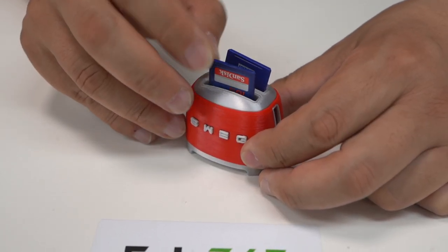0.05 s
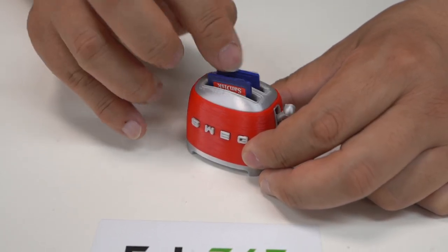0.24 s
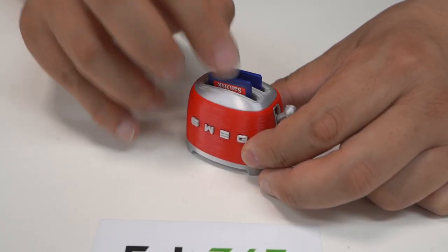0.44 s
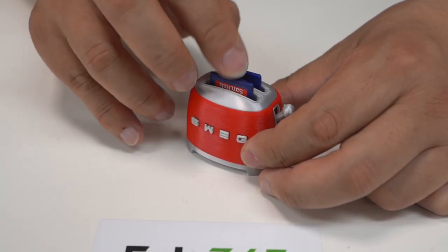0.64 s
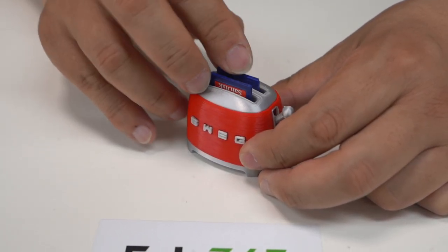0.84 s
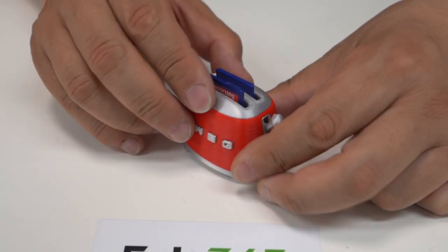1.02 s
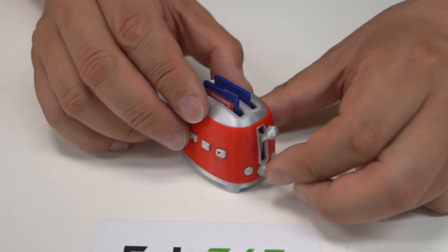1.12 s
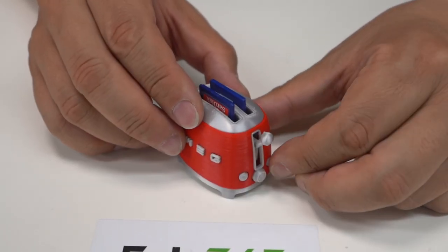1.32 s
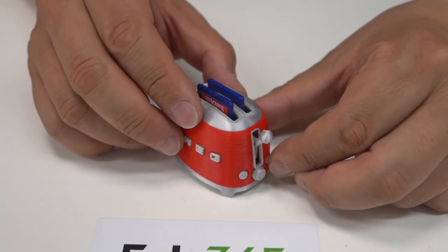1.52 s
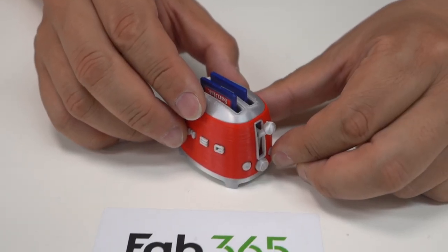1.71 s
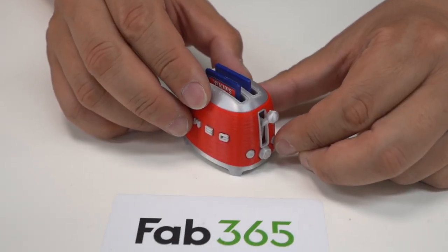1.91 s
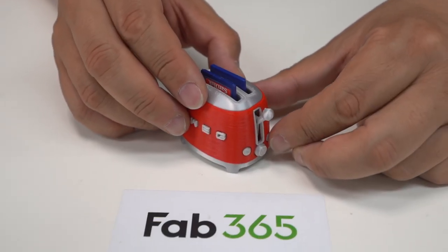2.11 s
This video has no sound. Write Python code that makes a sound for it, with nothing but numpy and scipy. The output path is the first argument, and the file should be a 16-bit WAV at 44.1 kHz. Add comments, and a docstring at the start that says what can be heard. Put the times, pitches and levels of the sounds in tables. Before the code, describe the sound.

A sharp plastic snap, led by light ticks and a tiny scrape, as two memory cards are pushed into a small hollow holder. Two softer clicks follow, then faint finger rubbing, close by on a table in a quiet room.

```python
"""Light ticks, then a short scrape and a sharp snap: two memory cards are pushed home in a small hollow
plastic holder, close by on a table. A fingertip presses them twice more, then hands turn the holder.
Each impact excites damped modes of the shell, its base and the table; stick-slip friction makes the
scrape and the rubbing of skin. A quiet small room adds a short reverberation and a low steady noise."""
import sys
import numpy as np
from scipy import signal
from scipy.fft import rfft, irfft, next_fast_len
from scipy.io import wavfile
from scipy.ndimage import uniform_filter1d

SR = 44100
rng = np.random.default_rng(int(sys.argv[2]) if len(sys.argv) > 2 else 0)


def file_out(sig):
    """Save sig as 16-bit WAV at sys.argv[1]."""
    # one column per channel
    cols = np.atleast_2d(sig).T
    # limit, then scale
    lim = np.clip(cols, -1, 1)
    pcm = np.round(lim * 32767).astype(np.int16)
    wavfile.write(sys.argv[1], SR, pcm)


N = 94815

# impacts of cards and holder: t/s, shell level/dB, favoured f/Hz, crack/dB, base/dB, table/dB
IMPACTS = [(.0072, -54.5, 2740, -76, -51, -70), (0.0783, -61, 4680, -74, -53.5, -63),
           (0.0782, -39, 3004, -54.5, -46, -61), (0.0884, -54.5, 4040, -69, -47, -76),
           (0.2384, -18, 4170, -16, -24, -55.5), (0.24, -24.5, 5400, -38, -28, -46),
           (0.2612, -31, 2900, -64, -37, -62), (0.334, -70, 4780, -51, -73, -74),
           (0.3562, -69, 4510, -50.5, -60, -70), (0.4872, -43, 1780, -69, -71, -40),
           (0.4895, -36, 3780, -51, -52, -36.5), (0.5056, -50, 2400, -72, -45, -37),
           (.5088, -39, 2410, -56, -46.5, -46), (0.7526, -37.5, 1670, -48.5, -49, -63),
           (0.7549, -33.5, 3916, -43, -38, -57), (0.7671, -41, 4370, -45, -59, -71.5),
           (1.0585, -73, 3900, -61.5, -70, -77), (1.1527, -80, 3870, -80, -58, -68),
           (1.1953, -60.5, 4010, -71, -62.5, -72.5), (2.1162, -56, 3950, -64, -75, -83)]
# normal modes of the shell, its base and the table: f/Hz, relative level/dB, t60/s
SHELL_MODES = [(1210, -10, 0.032), (1820, -11.5, .012), (2900, -6.5, .016), (3620, -6.5, .022),
               (3950, -2, 0.022), (4530, -3, 0.0076), (4950, -4.5, .01), (5370, -8.5, 0.0089),
               (6480, -5, .01)]
BASE_MODES = [(372, -9.5, 0.1), (472, -4, 0.046), (537, -11, .035), (728, -14.5, 0.012), (830, -12, .025),
              (957, -10.5, .025), (1042.7, -8.5, 0.033)]
TABLE_MODES = [(102.8, -13, .06), (158.9, -5.5, .05), (237, 0, .05), (281, -3, .045)]
# a card sliding in its slot: t/s, duration/s, scrape level/dB, drumming of the base/dB
SLIDES = [(0.2243, 0.017, -32.5, -35)]
# fingernail brushing the cards: t/s, rise/s, ring t60/s, ring level/dB, hiss level/dB
BRUSHES = [(0.591, 0.0042, 0.22, -63, -78), (.905, 0.018, 0.086, -79.5, -73),
           (1.128, .01, 0.07, -81.5, -74), (1.70, .02, 0.21, -81, -89)]
# envelope of the fingers' rubbing: t/s, level/dB
RUB_LEVELS = [(0, -62), (.1, -66.5), (.2, -71.5), (.45, -76.5), (.62, -76.5), (.72, -75), (0.919, -70),
              (0.999, -74), (1.05, -64.5), (1.121, -69), (1.172, -64.5), (1.23, -75), (1.5, -80.5),
              (1.72, -74.5), (1.881, -76.5), (2.039, -70), (2.09, -64.5), (2.15, -76)]
# judders of the turning holder and a finger's stick-slip tone: t/s, duration/s, f/Hz, level/dB
JUDDERS = [(1.22, 0.11, 135.5, -67.5), (1.972, 0.057, 249, -60.5), (1.983, 0.075, 68, -65.5)]
# spectra of the impact and friction noises: f/Hz, relative level/dB
CRACK_SPECTRUM = [(40, -27), (300, -7), (1200, -8.5), (2200, -22.5), (4300, -5), (6000, 5), (8200, -2.5),
                  (10500, 0), (12500, -0.5), (14000, -7.5), (16500, -7.5)]
CHATTER_SPECTRUM = [(40, -27.5), (200, -5.5), (1000, 3), (1300, -8.5), (2000, -8), (4200, -0.5), (5600, -8),
                    (7500, -19), (16000, -27)]
SCRAPE_SPECTRUM = [(40, -30.5), (300, -13.5), (1000, 0), (2100, -9), (3300, -4.5), (4300, 4.5),
                   (5400, -2.5), (7500, -13), (10800, -3.5), (13500, -11.5), (16500, -11.5)]
DRUM_SPECTRUM = [(30, -37), (70, -17), (170, 0.5), (450, -7), (1000, -11), (1300, -19.5), (6000, -46.5)]
CARD_SPECTRUM = [(1000, -15), (3000, -15.5), (3700, -6.5), (4200, -1), (4800, -9.5), (5800, -21),
                 (9000, -21.5), (16000, -43)]
HISS_SPECTRUM = [(2000, -10), (6000, -2), (13000, 0), (16000, 3)]
SKIN_SPECTRUM = [(60, -14), (150, -3.5), (280, 6), (450, 0.5), (650, -7.5), (1000, -10.5), (1800, -20),
                 (3000, -23.5), (4300, -19), (6500, -42), (16000, -30.5)]
# reverberation time of the room: f/Hz, t60/s
REVERB_T60 = [(150, 0.43), (500, 0.33), (2500, 0.31), (5500, 0.38), (12000, 0.22)]
# spectra of the reverberation and of the mid and side background noise: f/Hz, relative level/dB
REVERB_SPECTRUM = [(80, -10), (200, -2.5), (450, 0.5), (750, 1), (1000, 0), (1400, 5), (2000, 3.5),
                   (3000, -1), (4200, -5.5), (5400, -4), (6300, -5), (7500, -8.5), (11000, -10.5),
                   (16000, -20)]
FLOOR_SPECTRUM = [(12, -30), (20, -7.5), (171, 1), (225, -7.5), (252, 1), (282, -8.5), (362, -3.5),
                  (491, -18), (631, -13), (1010, -24), (1300, -23), (2840, -25.5), (15500, -30)]
SIDE_SPECTRUM = [(20, -8), (100, -12.5), (1000, -21.5), (16000, -20)]


def impacts(crack_t60_s=0.007, chatter_t60_s=0.013, focus_db_per_octave=14):
    """Impact excitation: a contact cracks, chatters and rings the modes of shell, base and table."""
    out, t = np.zeros(N), np.arange(SR // 10) / SR
    for start, shell_db, focus_hz, crack_db, base_db, table_db in IMPACTS:
        crack_noise, chatter_noise = rng.standard_normal((2, len(t)))
        spike = amp(11) * (t == 0)
        crack = colour(spike + amp(-12.5 - 60 * t / crack_t60_s) * crack_noise, CRACK_SPECTRUM)
        chatter = colour(amp(-4.5 - 60 * t / chatter_t60_s) * chatter_noise, CHATTER_SPECTRUM)
        # the contact point favours the modes near one frequency
        excited = [(hz, db - focus_db_per_octave * abs(np.log2(hz / focus_hz)), t60)
                   for hz, db, t60 in SHELL_MODES]
        shell = amp(-4.5) * ring(excited, t, scatter_db=0.5, detune=0.0044) + chatter
        base = amp(base_db) * ring(BASE_MODES, t, scatter_db=2.5, detune=0.0045)
        table = amp(table_db) * ring(TABLE_MODES, t, scatter_db=1.5, detune=0.006)
        add(out, start, amp(shell_db) * shell + amp(crack_db) * crack + base + table)
    return out


def ring(modes, t, scatter_db, detune, rise_cycles=0.38):
    """Free vibration is a sum of damped modes; their levels and tuning vary from touch to touch."""
    out = np.zeros(len(t))
    for hz, db, t60 in modes:
        decay = amp(db + scatter_db * rng.normal() - 60 * t / t60)
        onset = 1 - np.exp(-t * hz / rise_cycles)
        out += decay * onset * np.sin(2 * np.pi * hz * (1 + detune * rng.normal()) * t)
    return out


def card_slide(rise_s=0.0045, fall_s=0.0013):
    """Stick-slip friction: a card scrapes down its slot and forces the base to drum."""
    out, t = np.zeros(N), np.arange(SR // 10) / SR
    for start, duration, scrape_db, drum_db in SLIDES:
        stroke = np.clip(t / rise_s, 0, 1) ** 2 * np.clip((duration - t) / fall_s, 0, 1)
        friction = stroke * slips(len(t), per_s=12000)
        add(out, start, amp(scrape_db) * colour(friction, SCRAPE_SPECTRUM))
        add(out, start, amp(drum_db) * colour(friction, DRUM_SPECTRUM))
    return out


def slips(n, per_s, spread_db=1.5):
    """Friction as shot noise: tiny slips of random time, sign and size, at unit rms."""
    pulses = (rng.random(n) < per_s / SR) * rng.choice([-1, 1], n)
    return unit(pulses * amp(spread_db * rng.standard_normal(n)))


def fingernail_brushes(hiss_t60_s=0.057):
    """Resonance driven by friction: a fingernail grazes a card edge, which hisses and rings on in a band."""
    out, t = np.zeros(N), np.arange(SR // 3) / SR
    for start, rise, ring_t60, ring_db, hiss_db in BRUSHES:
        for db, t60, spectrum in (ring_db, ring_t60, CARD_SPECTRUM), (hiss_db, hiss_t60_s, HISS_SPECTRUM):
            stroke = np.minimum(t / rise, 1) * amp(db - 60 * np.maximum(t - rise, 0) / t60)
            add(out, start, colour(stroke * rng.standard_normal(len(t)), spectrum))
    return out


def finger_rubbing():
    """Source and filter: slips of skin on the hollow shell merge into a dull rustle."""
    level_db = np.interp(np.arange(N) / SR, *np.transpose(RUB_LEVELS))
    return amp(level_db) * unit(colour(slips(N, per_s=900), SKIN_SPECTRUM))


def friction_judders(pitch_spread=0.037):
    """Frictional oscillation: the holder, dragged round, and a slipping finger give short low tones of unsteady
    pitch."""
    out = np.zeros(N)
    for start, duration, hz, db in JUDDERS:
        n = int(duration * SR)
        waver = unit(uniform_filter1d(rng.standard_normal(N), size=300))[:n]
        phase = 2 * np.pi * np.cumsum(hz * (1 + pitch_spread * waver)) / SR
        add(out, start, amp(db) * signal.windows.tukey(n, 0.5) * np.sin(phase))
    return out


def reverberation(direct, delay_s=0.0034, build_s=0.0019):
    """A diffuse field decays exponentially in each band, fastest in the highest treble."""
    hz, t, bands = signal.stft(rng.standard_normal(SR // 2), SR, nperseg=256)
    decay = amp(-60 * t / along(REVERB_T60, hz)[:, None])
    tail = signal.istft(bands * decay, SR, nperseg=256)[1]
    tail *= np.clip((np.arange(len(tail)) / SR - delay_s) / build_s, 0, 1)
    response = colour(tail / np.linalg.norm(tail), REVERB_SPECTRUM)
    return signal.fftconvolve(direct, response)[:N]


def room_noise(spectrum, level_db):
    """Stationary Gaussian noise forms the steady background."""
    return amp(level_db) * unit(colour(rng.standard_normal(N), spectrum))


def amp(db):
    """Amplitude ratio of a level in decibels."""
    return 10 ** (np.asarray(db) / 20)


def unit(x):
    """Normalisation to unit rms."""
    return x / np.sqrt(np.mean(x ** 2) + 1e-20)


def along(points, hz):
    """Interpolation of (f/Hz, value) points over log frequency."""
    f, values = np.transpose(points)
    return np.interp(np.log(hz + 1), np.log(f + 1), values)


def colour(x, spectrum):
    """Minimum-phase filter of unit energy; folding the cepstrum makes it causal."""
    m = 2 * next_fast_len(len(x) // 2 + 4096)
    gain = unit(amp(along(spectrum, np.fft.rfftfreq(m, 1 / SR))))
    cepstrum = irfft(np.log(gain), m)
    cepstrum[1:m // 2] *= 2
    cepstrum[m // 2 + 1:] = 0
    return irfft(rfft(x, m) * np.exp(rfft(cepstrum)), m)[:len(x)]


def add(track, start_s, sound):
    """Superposition of a sound on the track at a given time."""
    i = max(0, round(start_s * SR))
    track[i:i + len(sound)] += sound[:max(0, N - i)]


def scene():
    """Direct and diffuse sound add in the centre; faint noise in antiphase gives a little width."""
    direct = impacts() + card_slide() + fingernail_brushes() + finger_rubbing() + friction_judders()
    floor = room_noise(FLOOR_SPECTRUM, level_db=-70.5)
    mid = direct + amp(-15.5) * reverberation(direct) + floor
    side = room_noise(SIDE_SPECTRUM, level_db=-80.5)
    return np.array([mid + side, mid - side])


def record(dry):
    """Band limiting: a low-pass filter with a raised-cosine edge."""
    cutoff_hz, edge_hz = 16200, 700
    m = next_fast_len(N + SR // 2)
    edge = np.clip((cutoff_hz - np.fft.rfftfreq(m, 1 / SR)) / edge_hz + 0.5, 0, 1)
    return irfft(rfft(dry, m) * np.sin(edge * np.pi / 2) ** 2, m)[:, :N]


dry = scene()
out = record(dry)
file_out(out)
```